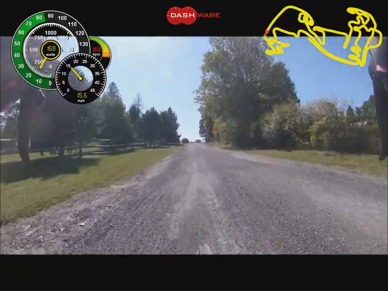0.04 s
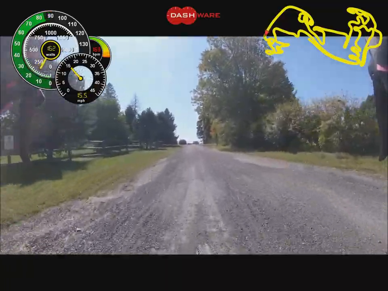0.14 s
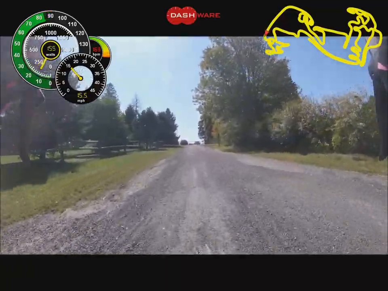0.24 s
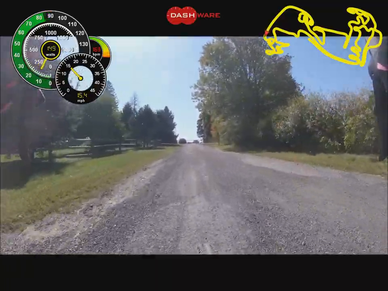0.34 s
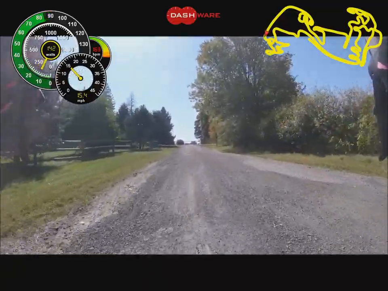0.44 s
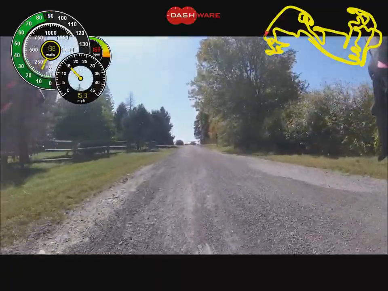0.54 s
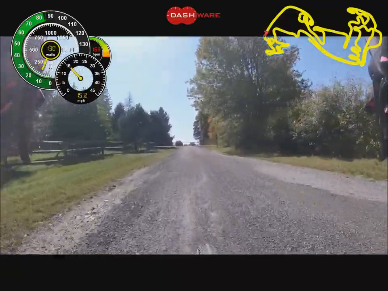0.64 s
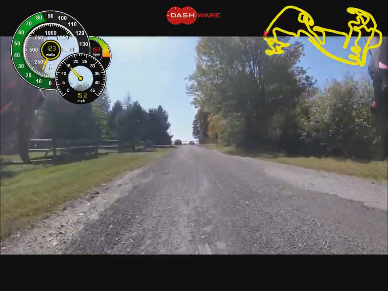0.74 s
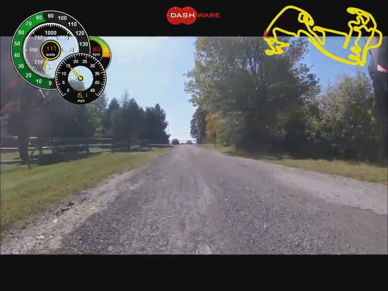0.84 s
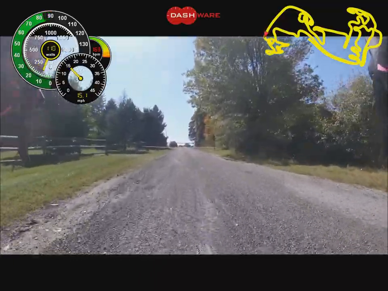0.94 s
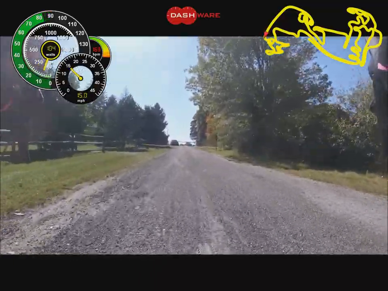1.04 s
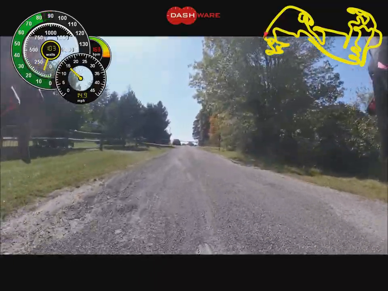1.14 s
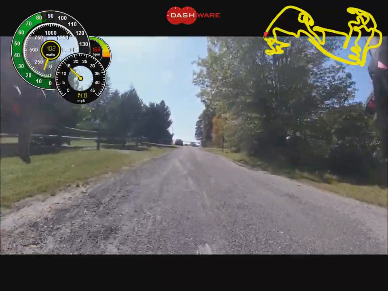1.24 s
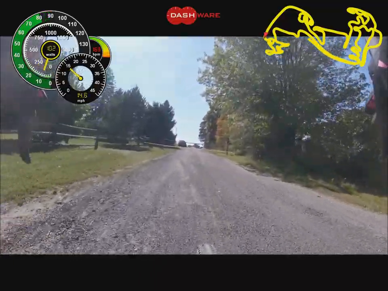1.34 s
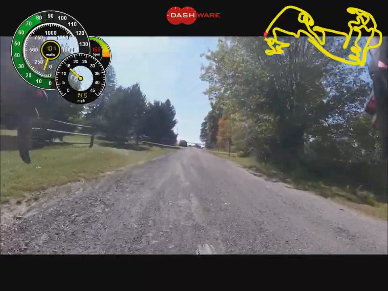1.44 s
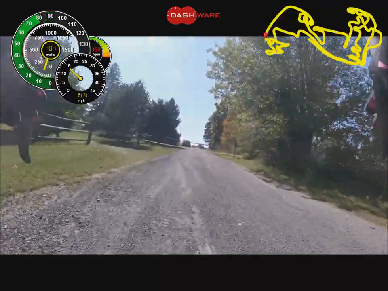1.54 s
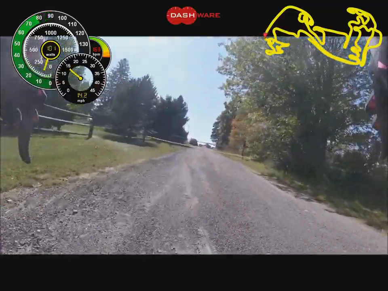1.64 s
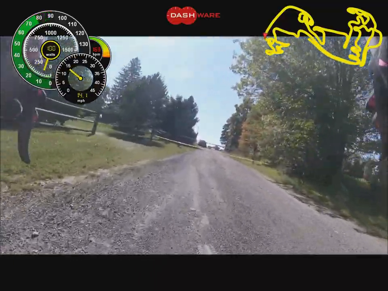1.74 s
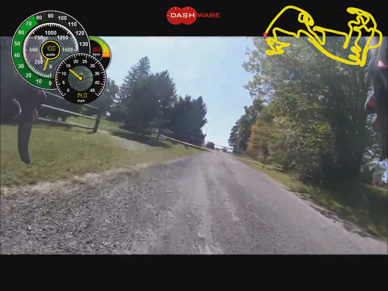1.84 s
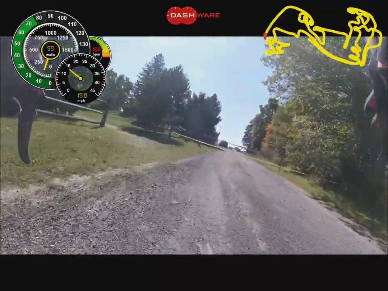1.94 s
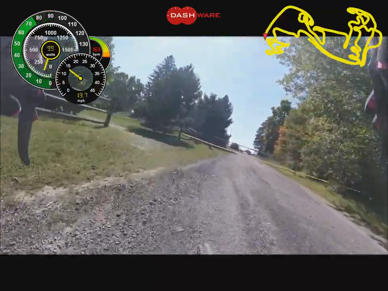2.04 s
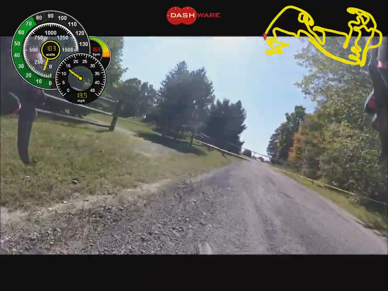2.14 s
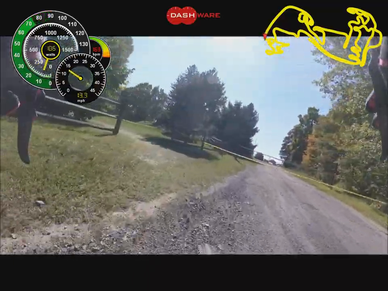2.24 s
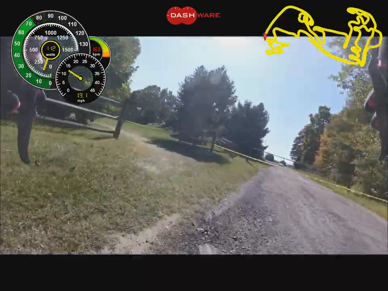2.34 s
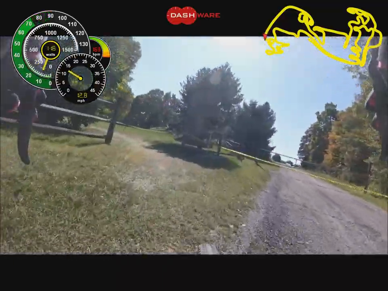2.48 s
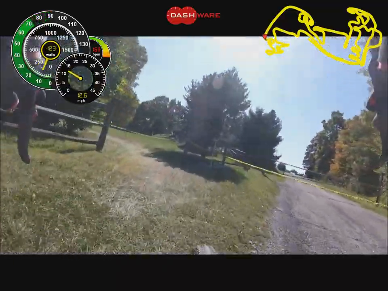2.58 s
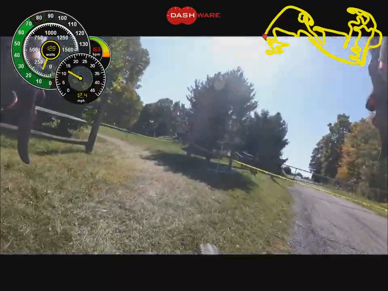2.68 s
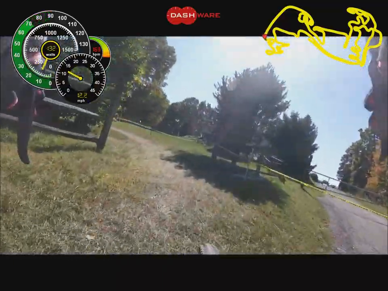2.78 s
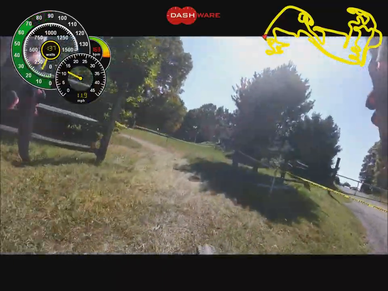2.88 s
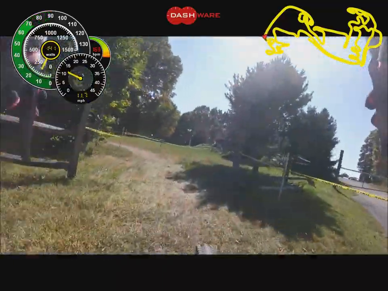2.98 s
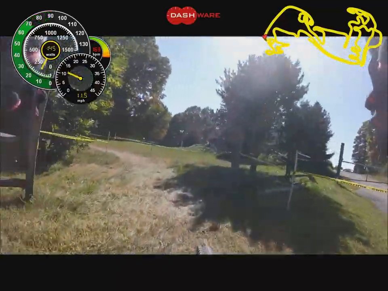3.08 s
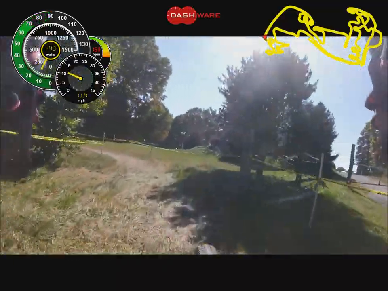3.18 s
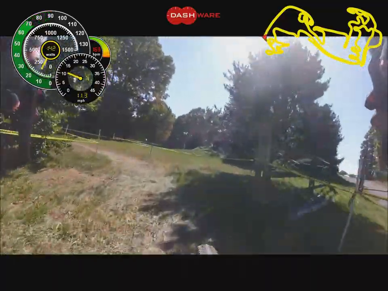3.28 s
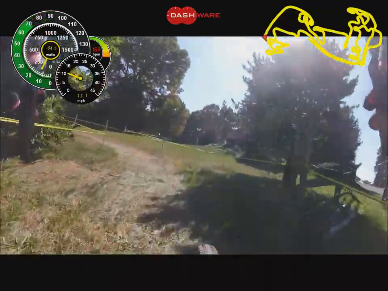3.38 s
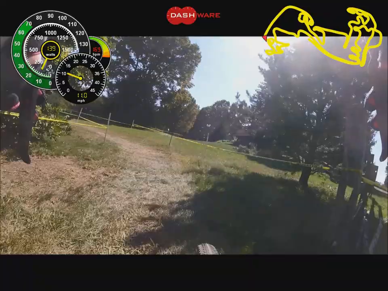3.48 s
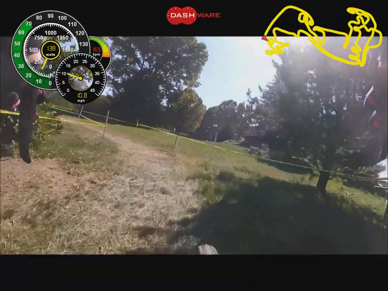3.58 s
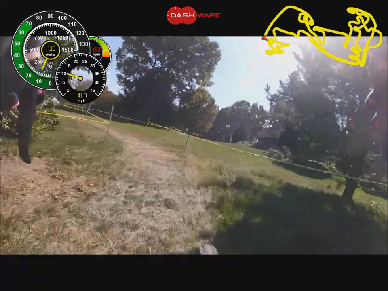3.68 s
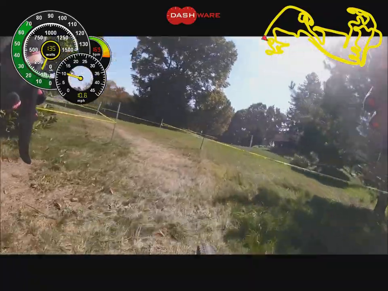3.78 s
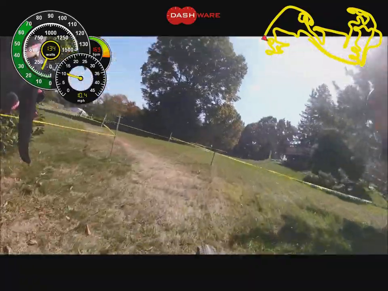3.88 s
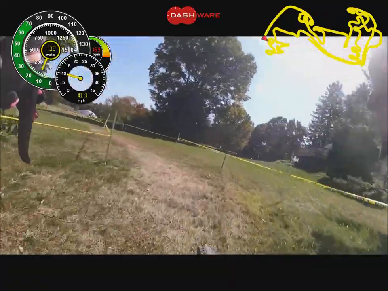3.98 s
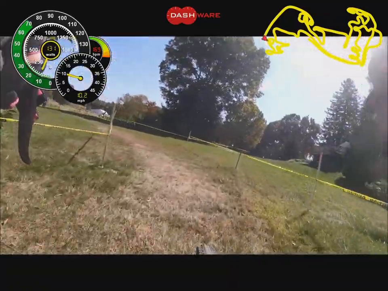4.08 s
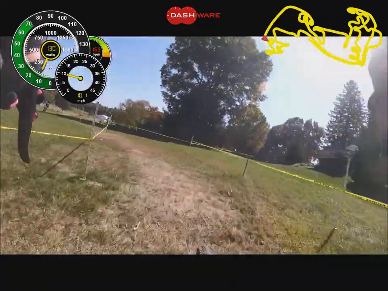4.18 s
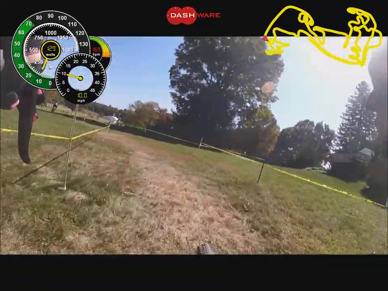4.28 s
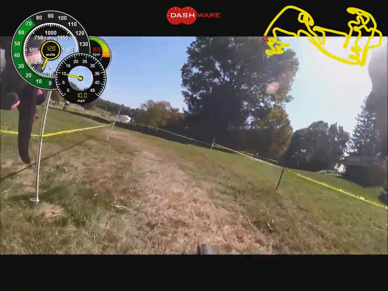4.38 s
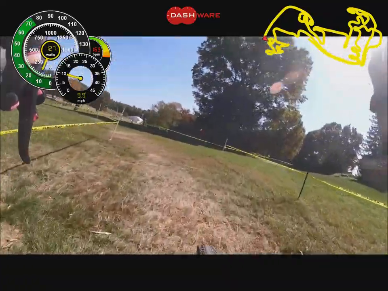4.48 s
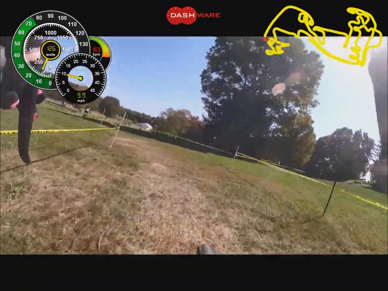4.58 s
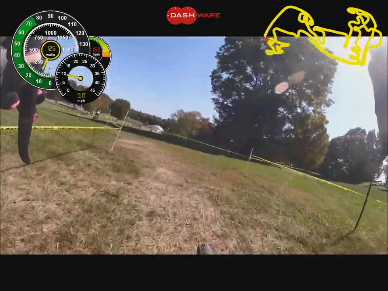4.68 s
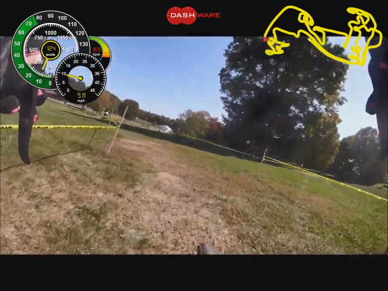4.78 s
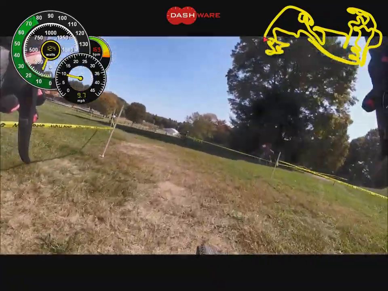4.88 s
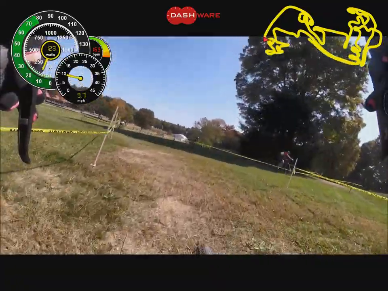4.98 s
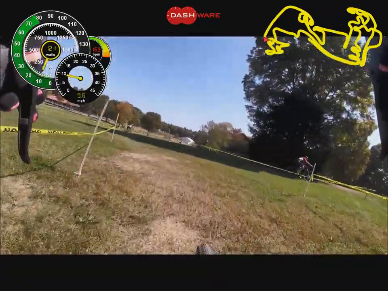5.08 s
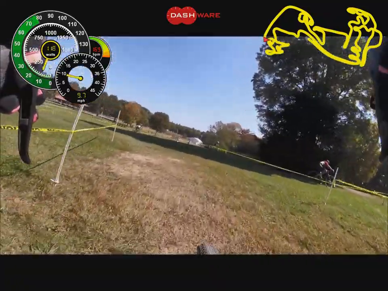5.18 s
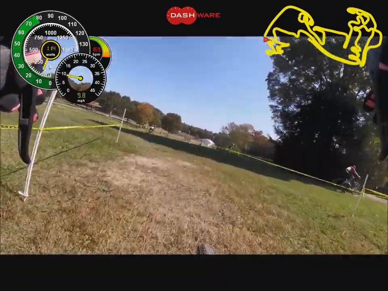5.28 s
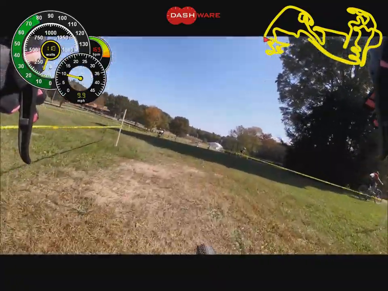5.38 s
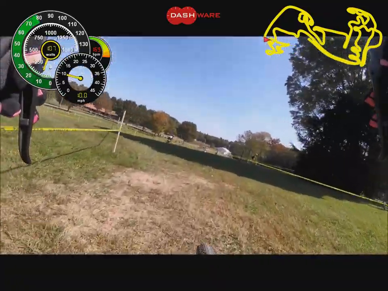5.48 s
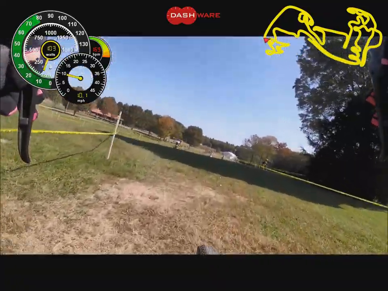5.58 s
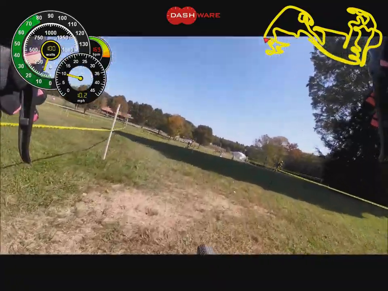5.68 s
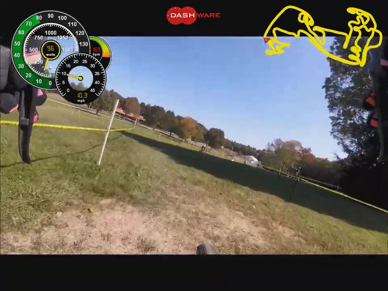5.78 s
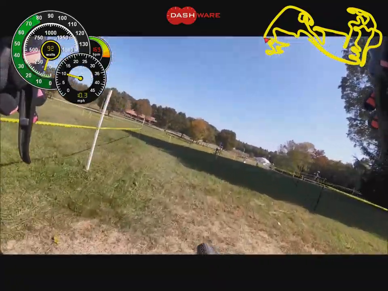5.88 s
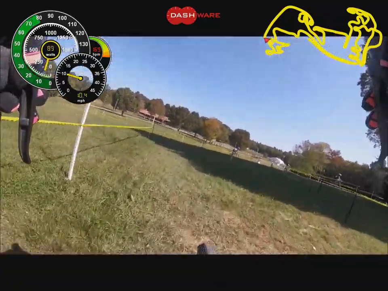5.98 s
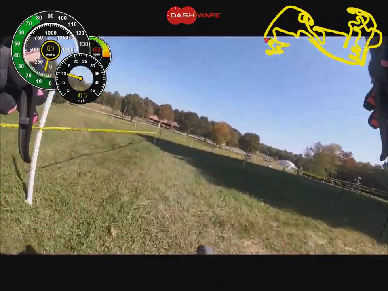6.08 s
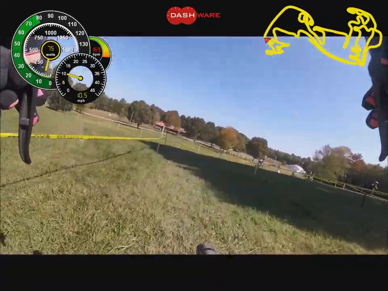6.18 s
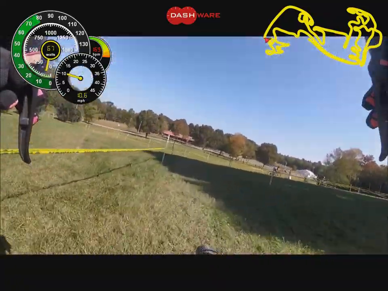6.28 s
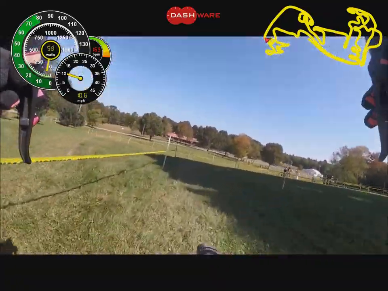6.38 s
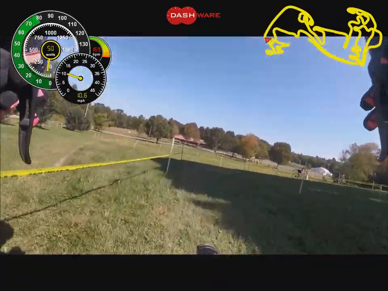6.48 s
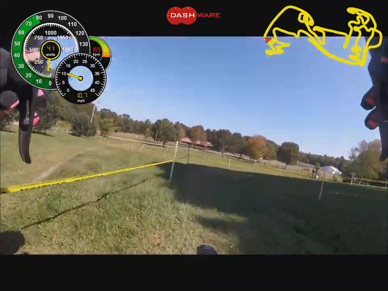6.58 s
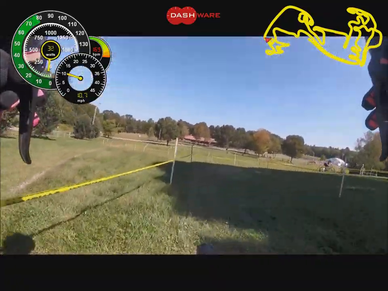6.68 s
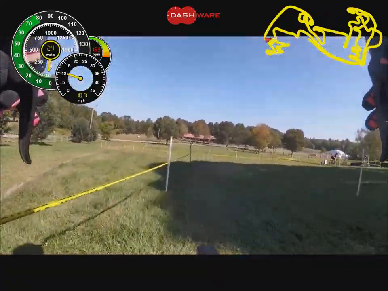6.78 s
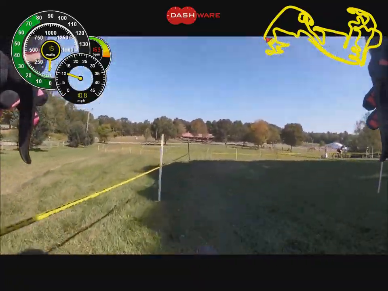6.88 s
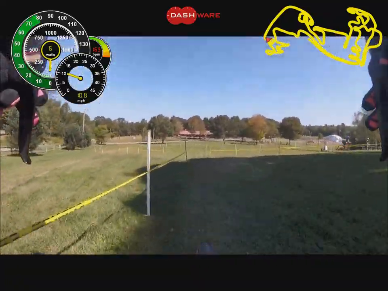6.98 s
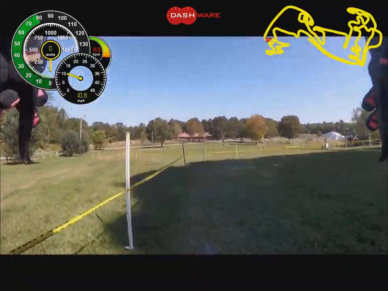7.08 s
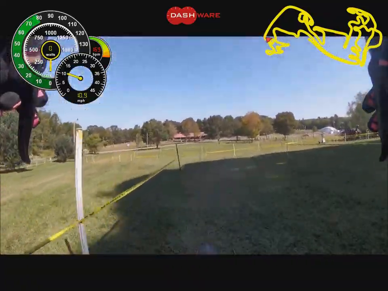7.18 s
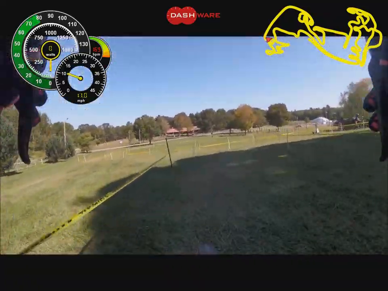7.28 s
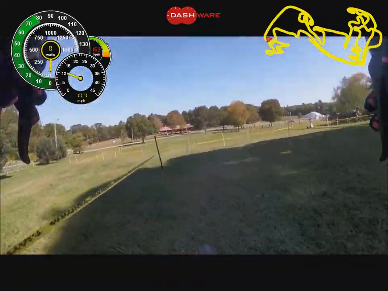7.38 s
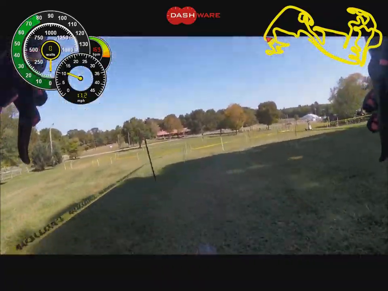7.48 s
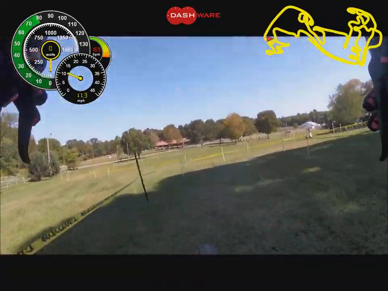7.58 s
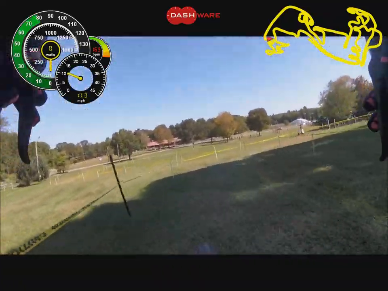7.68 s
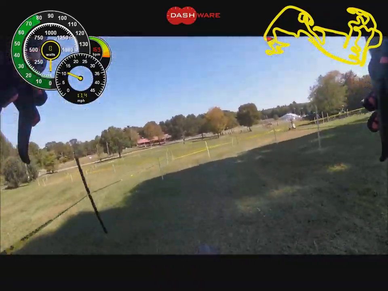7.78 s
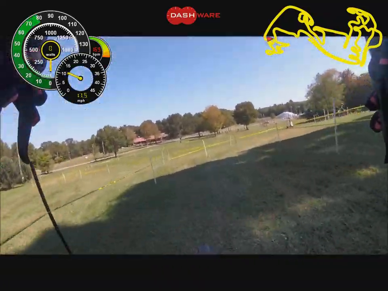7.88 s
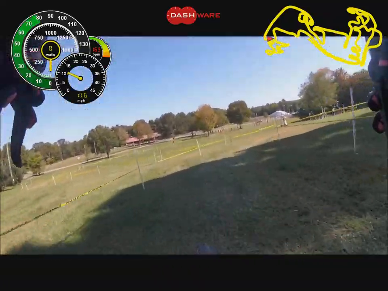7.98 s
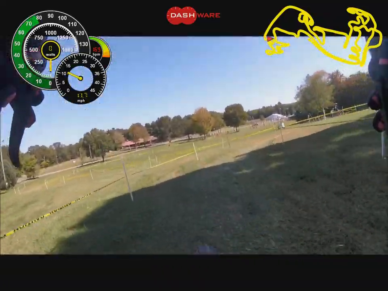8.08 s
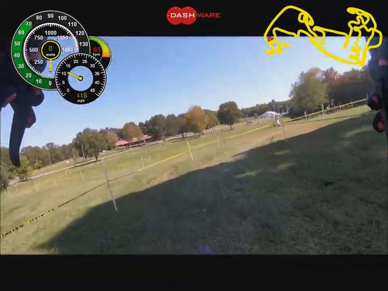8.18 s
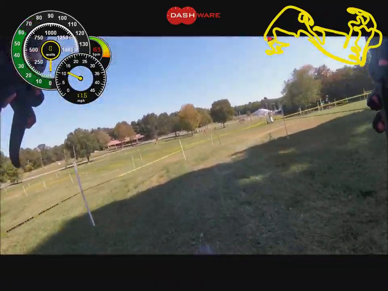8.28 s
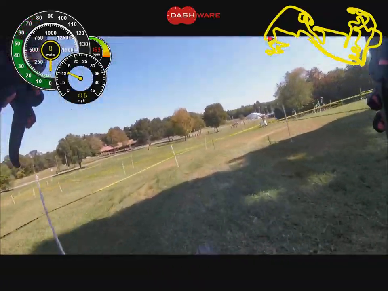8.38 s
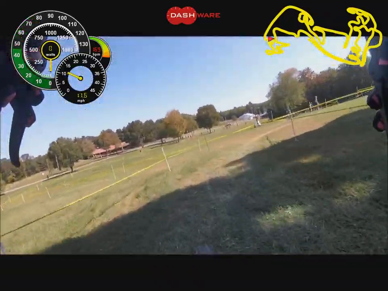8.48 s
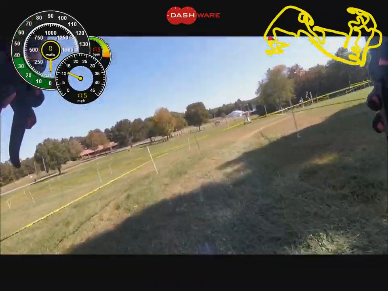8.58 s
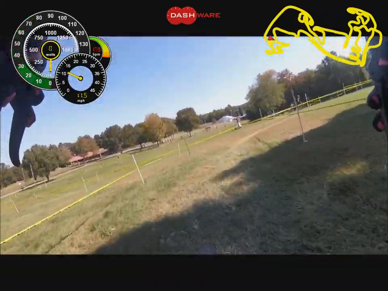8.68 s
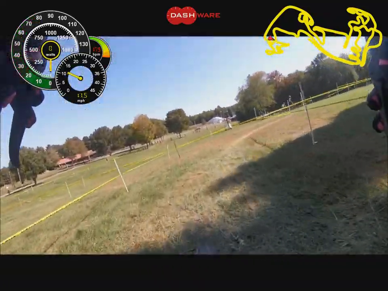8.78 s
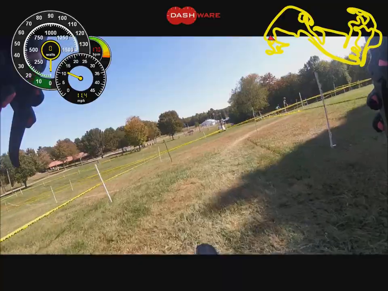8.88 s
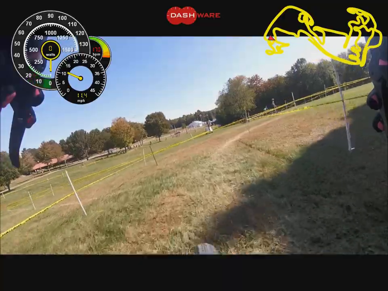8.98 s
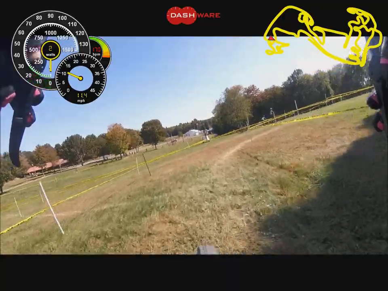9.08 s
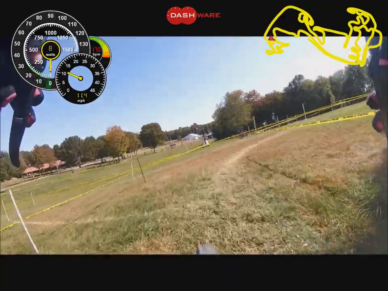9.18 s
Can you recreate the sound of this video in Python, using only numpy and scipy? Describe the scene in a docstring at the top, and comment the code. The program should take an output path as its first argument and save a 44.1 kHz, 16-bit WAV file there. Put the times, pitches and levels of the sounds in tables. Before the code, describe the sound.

Loud gravel rumble under a speeding bike softens to jolting grass, metallic chain ticks and plastic knocks, before the brake grinds, grabs and chirps.

```python
"""Gravel drums and crunches at once under a bicycle that races down a road, then turns onto bumpy grass.
Random impacts from stones and tufts pass through filters for the frame and a cased camera on the handlebar.
Bumps and wind shake the case, grass brushes the wheel, ruts rumble, the chain slaps and the mount knocks.
Near the end the freewheel ticks as spaced impulses, then filtered slips make the brake grind and grab.
Its short high squeaks are rough whistles that climb in pitch."""
import sys
import numpy as np
from scipy import signal
from scipy.fft import rfft, irfft
from scipy.io import wavfile
from scipy.ndimage import uniform_filter1d

SR = 44100
rng = np.random.default_rng(int(sys.argv[2]) if len(sys.argv) > 2 else 0)


def to_wav(s):
    """Save 16-bit WAV."""
    ch = np.atleast_2d(s).T  # columns
    pcm = np.round(np.clip(ch, -1, 1) * 32767)  # PCM
    wavfile.write(sys.argv[1], SR, pcm.astype(np.int16))


N = 407484
TIME = np.arange(N) / SR

# resonances of handlebar and case, a negative lift being a dip: (frequency [Hz], width [Hz], lift [dB])
CASE_MODES = [(231.9, 25, 15.5), (336, 42, 8), (486, 45.7, 9.5), (610.7, 55, 7), (886, 450, 2),
              (1714, 620, 5), (3465, 300, 8.5), (5110, 57, -13.5)]
# bending waves smear each blow around this frequency; the top is cut above the other
FLEX_HZ, CUTOFF_HZ = 820, 9000

# spectrum of the force that shakes the handlebar: (frequency [Hz], level [dB])
SHAKE_SPECTRUM = [(10, -10), (24, 0), (36, 3.5), (52, 8), (72, -1.5), (100, -10.5), (230, -31)]
# spectrum of stones and tufts drumming on the tread: (frequency [Hz], level [dB])
DRUM_SPECTRUM = [(50, -1.5), (95, 2.5), (170, 0.5), (280, -11), (420, -6.5), (600, -7.5), (760, -19),
                 (1100, -25.5), (2000, -61)]
# spectrum of smaller stones crunching: (frequency [Hz], level [dB])
CRUNCH_SPECTRUM = [(400, -7), (800, 2.5), (1100, -7.5), (1800, -18.5), (2200, -31.5)]
# spectrum of the faint crackle: (frequency [Hz], level [dB])
CRACKLE_SPECTRUM = [(1500, -3), (2700, 20), (3400, -0.5), (4200, -25), (5500, -6.5)]
# spectrum of grass blades on tyre and spokes: (frequency [Hz], level [dB])
BRUSH_SPECTRUM = [(1200, -13.5), (2700, 6.5), (3700, -11.5), (5400, 6), (6600, 4.5), (7600, -29.5)]
# spectrum of the dragging brake: (frequency [Hz], level [dB])
BRAKE_SPECTRUM = [(150, -16), (260, -17), (350, -0.5), (420, 0.5), (470, 3), (660, -11), (820, -5),
                  (1120, -10), (1320, -22.5), (1560, -19), (2100, -33), (3200, -62.5)]
# spectrum of the fork juddering: (frequency [Hz], level [dB])
JUDDER_SPECTRUM = [(200, -10.5), (350, 3.5), (500, 4), (700, -14.5), (1300, -21)]
# spectrum of grit under the pads: (frequency [Hz], level [dB])
SCRAPE_SPECTRUM = [(500, -21), (1100, 1.5), (1700, -7), (2200, -25)]
# spectrum of the mount knocking: (frequency [Hz], level [dB])
KNOCK_SPECTRUM = [(190, -6), (350, -20), (560, -10), (830, -0.5), (1080, -6.5), (1300, -22.5), (1650, -17),
                  (2300, -34.5)]
# spectrum of dull blows to the frame: (frequency [Hz], level [dB])
THUD_SPECTRUM = [(80, -34.5), (200, 5.5), (350, 0.5), (600, 5), (950, -7.5), (1400, -23), (2300, -47)]
# spectrum of sharp, hard clicks: (frequency [Hz], level [dB])
CLICK_SPECTRUM = [(300, -13), (950, 11.5), (1400, 3.5), (2500, -5.5), (3600, -11), (5600, -3.5),
                  (6800, -13.5), (8200, -24), (10000, -41.5)]

# steady sway of the handlebar from wind and rough ground: (time [s], level [dB])
SWAY_LEVELS = [(0, -25.5), (.65, -33), (1.0, -29.5), (2.05, -23.5), (2.55, -32), (3.65, -23.5),
               (4.45, -33.5), (5.5, -26), (9.24, -21.5)]
# bumps that jolt the handlebar: (time [s], peak level [dB])
JOLTS = [(.96, -20.5), (1.33, -19.5), (1.859, -20), (2.049, -22.5), (3.14, -19.5), (3.489, -19),
         (4.251, -19), (5.79, -20.5), (5.999, -23), (6.631, -19.5), (6.849, -20.5), (7.102, -17.5),
         (7.74, -23.5), (8.02, -18.5), (8.389, -21.5), (9.181, -18)]
JOLT_RISE_S, JOLT_FALL_S = 0.049, 0.11

# longer grass brushes the wheel: (middle [s], length [s], level [dB])
GRASS_BRUSHES = [(3.28, 0.072, -58), (3.97, 0.11, -69.5), (4.12, .11, -65.5), (4.4, 0.08, -66),
                 (4.64, 0.12, -66.5), (4.77, 0.045, -65), (5.68, 0.16, -67), (6.55, 0.16, -67.5),
                 (7.41, 0.23, -64), (8.12, 0.051, -60), (8.5, 0.22, -63.5), (8.68, .1, -62),
                 (8.94, 0.31, -61)]
BLADES_PER_S = 350
# ruts in the grass: (middle [s], length [s], level [dB])
RUT_CROSSINGS = [(3.5, 0.31, -35.5), (5.802, 0.042, -25), (6.005, 0.033, -28), (6.31, 0.07, -26.5),
                 (8.37, 0.1, -28)]
# patches of faint, uneven crackle over the gravel: (middle [s], length [s], strength [dB])
CRACKLE_PATCHES = [(.55, 0.65, -60), (1.13, 0.27, -49.5), (1.72, 0.2, -52.5), (2.05, 0.29, -54)]
CRACKLES_PER_S, CRACKLE_CHATTER_S = 55, 0.008

# the freewheel ticks while the bike coasts; the level is that of a typical tick
COAST_FROM_S, COAST_TO_S, PAWLS_PER_S, PAWL_DB = 7.22, 7.52, 63, -53
# the chain slaps the frame: (time [s], strength of the blow [dB])
CHAIN_SLAPS = [(0.597, -39.5), (1.428, -35.5), (1.753, -42.5), (2.19, -29.5), (2.718, -34), (2.795, -38),
               (2.853, -35), (2.8918, -36), (3.0292, -33), (3.104, -40), (3.225, -33), (3.2868, -31),
               (3.347, -39), (3.575, -32.5), (3.654, -35), (3.68, -30), (3.878, -25.5), (4.2665, -30.5),
               (5.032, -42.5), (5.14, -38), (5.5585, -28.5), (5.7438, -29), (5.784, -35), (5.939, -40.5),
               (6.059, -36.5), (6.536, -36.5), (6.758, -27.5), (6.849, -37), (6.9158, -36.5),
               (7.169, -36.5), (7.221, -35), (7.3, -34), (7.3566, -30), (7.606, -35.5), (7.7786, -30),
               (7.866, -28.5), (8.4497, -30.5), (8.9421, -31.5)]
CHAIN_TOUCHES_PER_S = 450
# resonances of chain and sprockets: (frequency [Hz], width [Hz], middle level [dB])
METAL_MODES = [(1180, 200, 4.5), (2670, 430, -3), (5370, 480, 2), (6370, 460, 7.5)]

# grit scrapes under the pads: (middle [s], length [s], level [dB])
GRIT_SCRAPES = [(7.632, 0.014, -32), (8.084, 0.013, -27.5), (8.148, 0.026, -34.5)]
# pad squeaks: (middle [s], length [s], middle pitch [Hz], level before flutter [dB])
PAD_SQUEAKS = [(7.854, 0.024, 7370, -33.5), (8.184, 0.016, 7400, -33.5), (8.251, 0.014, 7300, -37),
               (8.387, 0.015, 7560, -36), (8.439, 0.031, 6950, -38.5), (8.507, 0.021, 7100, -35),
               (8.576, .022, 7280, -37.5), (8.704, 0.022, 6880, -33.5), (8.832, 0.034, 7100, -41.5),
               (8.897, 0.034, 7100, -37.5), (8.966, 0.034, 7200, -43)]
# every squeak climbs at the same rate, between two notes of the pad
CLIMB_HZ_PER_S, PAD_LOW_HZ, PAD_HIGH_HZ = 31000, 6730, 7450
# the pads grab: (middle [s], length [s], level [dB])
PAD_GRABS = [(7.692, 0.039, -16.5), (7.772, 0.02, -20), (7.844, 0.06, -19), (8.33, 0.046, -30.5),
             (9.095, 0.054, -18.5), (9.205, 0.037, -26)]
# the brake is pulled, bites hard, then eases to a steady drag
BRAKE_ON_S, BRAKE_ATTACK_S, BRAKE_BITE_S, BRAKE_EASE_S = 7.55, 0.077, 0.27, 0.21
BITE_DB, DRAG_DB = -24.5, -29

# knocks in the camera mount: (time [s], strength of the body [dB], strength of the click [dB])
MOUNT_KNOCKS = [(0.2347, -5, -24.5), (0.297, -13, -26), (2.173, -21, -35), (3.254, -17.5, -42),
                (3.555, -14.5, -31), (4.4466, -3, -23), (4.534, -12.5, -19.5), (4.7269, -12.5, -26.5)]
# the mount buzzes briefly: (time [s], strength [dB])
MOUNT_BUZZES = [(4.255, -23), (4.558, -15.5), (4.601, -13.5), (6.83, -21)]
BUZZ_TOUCHES_PER_S = 5000  # a loose mount touches very densely
# dull thuds of the frame, from stones, bumps and brake grabs: (time [s], strength of the blow [dB])
FRAME_THUDS = [(0.464, -10.5), (0.5, -7.5), (.968, -14), (1.363, -10.5), (1.843, -11), (2.1725, -8.5),
               (2.331, -14), (2.378, -14), (4.8007, -5), (4.8217, -7), (4.8427, -5), (5.793, -14.5),
               (6.305, -18.5), (7.765, -10), (9.079, -11.5)]

# the tyres leave the gravel for grass
TURN_OFF_S, TURN_TAKES_S = 2.205, 0.37
# the bike gathers speed on the road until this time, from a quieter start, and slowly loses it on grass
UP_TO_SPEED_S, START_DB, SLOWING_DB_PER_S = 0.95, -2.5, 0.14
# tyre levels on each ground, before changes with speed and ground
GRAVEL_DRUM_DB, GRAVEL_CRUNCH_DB = -22, -41
GRASS_DRUM_DB, GRASS_CRUNCH_DB = -33.5, -44
# share of a jolt's rise in level that the loaded tyres follow
DRUM_FOLLOWS, CRUNCH_FOLLOWS = 0.055, 0.47
# larger stones pop from under the tread: (time [s], strength [dB])
STONE_POPS = [(0.453, -14), (0.655, -17), (0.718, -17), (1.742, -14)]


def from_db(db):
    """Turn decibels into gain."""
    return 10 ** (np.asarray(db) / 20)


def rms_one(x):
    """Scale to an average power of 1."""
    return x / np.sqrt(np.mean(x ** 2) + 1e-20)


def evened(x, size):
    """Hold the power near 1 over stretches of about this many samples."""
    power = uniform_filter1d(uniform_filter1d(x ** 2, size=size), size=size // 2)
    return x / np.sqrt(power + 1e-12)


def drift(rate_hz):
    """Slow random wander of spread 1, made at every 40th sample and joined by straight lines."""
    r = np.exp(-80 * np.pi * rate_hz / SR)
    noise = rng.standard_normal(N // 40 + 2002)
    slow = signal.lfilter([1], [1, -2 * r, r * r], noise)[2000:]  # skip the filter's start
    return np.interp(np.arange(N) / 40, np.arange(len(slow)), rms_one(slow))


def swells(rows, order=2):
    """A gain that rises and falls around each moment; a higher order gives a flatter top and steeper ends."""
    gain = np.zeros(N)
    for s, length, db in rows:
        distance = np.abs(2 * (TIME - s) / length) ** order
        gain += from_db(db) * np.exp(-np.minimum(distance, 20))
    return gain


def resonate(x, hz, width_hz):
    """Ring at one frequency; a narrower width rings longer."""
    return signal.lfilter(*signal.iirpeak(hz, hz / width_hz, fs=SR), x)


def response(spectrum, size=8192):
    """The sound of a single blow with this spectrum, coloured by the case resonances; peak 1."""
    hz, db = np.transpose(spectrum)
    grid = np.maximum(np.arange(size // 2 + 1) * SR / size, 1)
    fall_db = 30 * np.log2(np.maximum(grid / hz[-1], 1))  # 30 dB per octave past the last point
    log_gain = np.log(from_db(np.interp(np.log(grid), np.log(hz), db) - fall_db))
    # the cepstrum gives a pulse with its energy as early as this spectrum allows
    cepstrum = irfft(log_gain)[:size // 2]
    cepstrum[1:] *= 2
    pulse = irfft(np.exp(rfft(cepstrum, size)))
    for mode_hz, width_hz, lift_db in CASE_MODES:
        pulse = pulse + (from_db(lift_db) - 1) * resonate(pulse, mode_hz, width_hz)
    return pulse / np.abs(pulse).max() * np.hanning(2 * size)[size:]


def through_case(force, spectrum):
    """What the microphone hears of a force; the frame delays the lows behind the highs."""
    _, poles = signal.iirpeak(FLEX_HZ, 1, fs=SR)
    smeared = signal.lfilter(poles[::-1], poles, response(spectrum))  # changes timing, not balance
    return signal.oaconvolve(force, smeared)[:N]


def blows(times, db):
    """One impulse for each contact."""
    force = np.zeros(N)
    places = np.round(np.asarray(times) * SR).astype(int)
    force[np.clip(places, 0, N - 1)] = from_db(db)
    return force


def grains(per_s, spread_db):
    """Tiny impacts at random moments, with random strengths and signs."""
    sizes = from_db(spread_db * np.minimum(rng.exponential(1, N), 4))
    return (rng.random(N) < per_s / SR) * sizes * rng.choice([-1, 1], N)


def chatter(force, decay_s, per_s=1200):
    """A dying run of random touches after each blow, with about as much energy as the blow itself."""
    r = np.exp(-2 / (decay_s * SR))
    energy = signal.lfilter([1 - r], [1, -r], force ** 2 + 1e-24)
    return np.sqrt(energy) * rms_one(grains(per_s, spread_db=-3.5))


def metal(force):
    """Ticks of steel on the bike; the balance of its resonances wanders from contact to contact."""
    ticks = through_case(force, CLICK_SPECTRUM)
    ringing = np.zeros(N)
    for hz, width_hz, db in METAL_MODES:
        gain = from_db(db + 7.4 * np.tanh(drift(30)))
        ringing += gain * resonate(ticks, hz, width_hz)
    return ticks + ringing


def sway_db():
    """Level of the steady sway at every sample, in dB."""
    return np.interp(TIME, *np.transpose(SWAY_LEVELS))


def jolting():
    """How far the bumps lift the shaking above the steady sway, in dB."""
    power = np.zeros(N)
    for s, db in JOLTS:
        near = np.abs(TIME - s) < 0.5
        since = TIME[near] - s
        width_s = np.where(since < 0, JOLT_RISE_S, JOLT_FALL_S)
        power[near] += (from_db(db) * np.exp(-(since / width_s) ** 2)) ** 2
    return 10 * np.log10(1 + power / from_db(sway_db()) ** 2)


def shake(jolt_db):
    """The handlebar sways at a few tens of cycles a second, as hard as bumps and wind push it."""
    sway = evened(through_case(rng.standard_normal(N), SHAKE_SPECTRUM), size=3000)
    return from_db(sway_db() + jolt_db + 0.5 * drift(19)) * sway


def brushing():
    """Blades of grass flick the tyre and spokes; each clump is a grainy rustle that starts and stops quickly."""
    rustle = evened(through_case(grains(BLADES_PER_S, spread_db=3), BRUSH_SPECTRUM), size=1800)
    return swells(GRASS_BRUSHES, order=6) * from_db(5 * np.tanh(drift(45))) * rustle


def ruts():
    """The front wheel crosses a rut with a short, dull rumble."""
    rumble = evened(through_case(grains(700, spread_db=4.0), THUD_SPECTRUM), size=900)
    return swells(RUT_CROSSINGS) * rumble


def crackle():
    """Patches of faint, uneven crackle over the gravel, made of sparse grains that each chatter briefly."""
    sparse = swells(CRACKLE_PATCHES) * grains(CRACKLES_PER_S, spread_db=4.3)
    return through_case(chatter(sparse, decay_s=CRACKLE_CHATTER_S), CRACKLE_SPECTRUM)


def freewheel():
    """The rider stops pedalling before braking, and the pawls tick over the ratchet."""
    s = np.arange(COAST_FROM_S, COAST_TO_S, 1 / PAWLS_PER_S)
    late, strength = rng.standard_normal((len(s), 2)).T
    pawls = blows(s + 0.0025 * late, PAWL_DB + 3.5 * strength)
    return metal(pawls + chatter(pawls, decay_s=0.005))


def chain():
    """The chain slaps the frame with a short metallic tick, then a few rebounds."""
    slap = blows(*np.transpose(CHAIN_SLAPS))
    # a faint swell leads into each slap
    lead_in = from_db(-6) * chatter(slap[::-1], decay_s=0.009, per_s=CHAIN_TOUCHES_PER_S)[::-1]
    rebounds = from_db(1.0) * chatter(slap, decay_s=0.0088, per_s=CHAIN_TOUCHES_PER_S)
    return metal(lead_in + slap + rebounds)


def scrapes():
    """Grit is dragged through the pads with a short, harsh rasp."""
    rasp = evened(through_case(grains(1600, spread_db=-1.5), SCRAPE_SPECTRUM), size=400)
    return swells(GRIT_SCRAPES) * rasp


def squeaks():
    """Each rough whistle climbs from the pad's lower note towards its upper one, inside a faint scrape."""
    out = np.zeros(N)
    waver, flutter, roughness = drift(200), from_db(3 * drift(130)), drift(400)
    for s, length, middle_hz, db in PAD_SQUEAKS:
        near = np.abs(TIME - s) < 2 * length
        since = TIME[near] - s
        climb_hz = np.clip(middle_hz + CLIMB_HZ_PER_S * since, PAD_LOW_HZ, PAD_HIGH_HZ)
        hz = climb_hz * (1 + 0.009 * waver[near])
        whistle = np.exp(-np.square(2 * since / length) ** 2) * flutter[near]
        scrape = 0.21 * np.exp(-(since / length) ** 2) * roughness[near]
        out[near] += from_db(db) * (whistle + scrape) * np.sin(2 * np.pi * np.cumsum(hz) / SR)
    return out


def brake():
    """The pads stick and slip unevenly; each grab sets the fork juddering."""
    slips = grains(1100, spread_db=3.2) * from_db(1.8 * drift(25))
    held_s = TIME - BRAKE_ON_S
    pressed = np.clip(held_s / BRAKE_ATTACK_S, 0, 1) ** 2
    bite = np.exp(-np.maximum(held_s - BRAKE_ATTACK_S - BRAKE_BITE_S, 0) / BRAKE_EASE_S)
    level_db = DRAG_DB + (BITE_DB - DRAG_DB) * bite
    grind = pressed * from_db(level_db) * rms_one(through_case(slips, BRAKE_SPECTRUM))
    judder = swells(PAD_GRABS) * evened(through_case(slips, JUDDER_SPECTRUM), size=700)
    return grind + judder


def knocks():
    """Hard plastic contacts and buzzes in the mount, and softer blows through the frame."""
    s, body_db, click_db = np.transpose(MOUNT_KNOCKS)
    body, click = blows(s, body_db), blows(s, click_db)
    thud = blows(*np.transpose(FRAME_THUDS))
    buzz = chatter(blows(*np.transpose(MOUNT_BUZZES)), decay_s=0.01, per_s=BUZZ_TOUCHES_PER_S)
    body_rattle = from_db(-6) * chatter(body, decay_s=0.0072, per_s=BUZZ_TOUCHES_PER_S)
    click_rattle = from_db(7.5) * chatter(click, decay_s=0.0024, per_s=BUZZ_TOUCHES_PER_S)
    thud_rattle = from_db(-12.0) * chatter(thud, decay_s=0.029)
    mount = through_case(body + body_rattle + buzz, KNOCK_SPECTRUM)
    snap = through_case(click + click_rattle + from_db(-23.0) * buzz, CLICK_SPECTRUM)
    frame = through_case(thud + thud_rattle, THUD_SPECTRUM)
    return mount + snap + frame


def on_grass():
    """Share of the tread that is on grass: 0 on the road, 1 after the turn."""
    return np.clip((TIME - TURN_OFF_S) / TURN_TAKES_S, 0, 1)


def stone_pops():
    """Larger stones pop from under the tread, each a single blow."""
    return through_case(blows(*np.transpose(STONE_POPS)), CRUNCH_SPECTRUM)


def tyres(jolt_db):
    """Stones and tufts drum on the tread and smaller ones crunch, following speed, ground and jolts."""
    grass = on_grass()
    start_db = START_DB * np.maximum(1 - TIME / UP_TO_SPEED_S, 0)
    slowing_db = SLOWING_DB_PER_S * np.maximum(TIME - TURN_OFF_S, 0)
    ground_db = start_db - slowing_db + 1.3 * grass * drift(2.6)
    grass_drum_db = GRASS_DRUM_DB + DRUM_FOLLOWS * jolt_db
    grass_crunch_db = GRASS_CRUNCH_DB + CRUNCH_FOLLOWS * jolt_db
    drum_db = (1 - grass) * GRAVEL_DRUM_DB + grass * grass_drum_db + ground_db
    crunch_db = (1 - grass) * GRAVEL_CRUNCH_DB + grass * grass_crunch_db + ground_db
    drum_hits = grains(1500, spread_db=3.5) * from_db(1.8 * drift(22))
    crunch_hits = grains(1500, spread_db=2) * from_db(2.0 * drift(40))
    drum = from_db(drum_db) * rms_one(through_case(drum_hits, DRUM_SPECTRUM))
    crunch = from_db(crunch_db) * rms_one(through_case(crunch_hits, CRUNCH_SPECTRUM))
    return drum + crunch


def scene():
    """Everything reaches the one microphone through the bike and the case."""
    jolt_db = jolting()
    ground = shake(jolt_db) + brushing() + ruts() + crackle() + stone_pops() + tyres(jolt_db)
    bike = freewheel() + chain() + scrapes() + squeaks() + brake() + knocks()
    return (ground + bike)[None]


def record(dry):
    """A steep filter cuts the top."""
    top_cut = signal.ellip(10, 0.1, 80, CUTOFF_HZ, fs=SR, output="sos")
    return signal.sosfilt(top_cut, dry)


dry = scene()
out = record(dry)
to_wav(out)
```